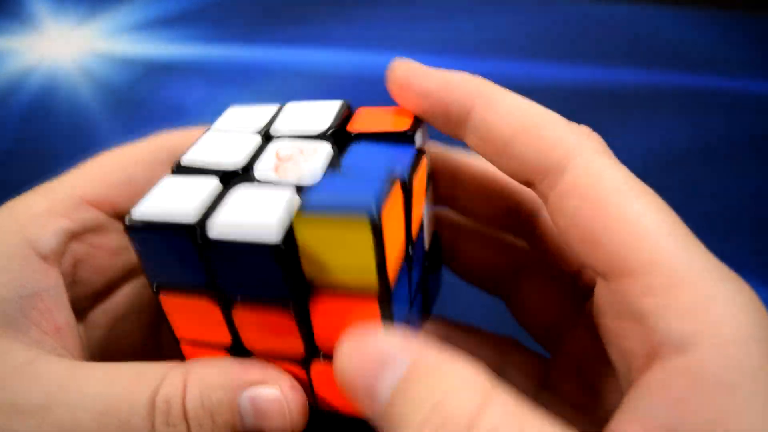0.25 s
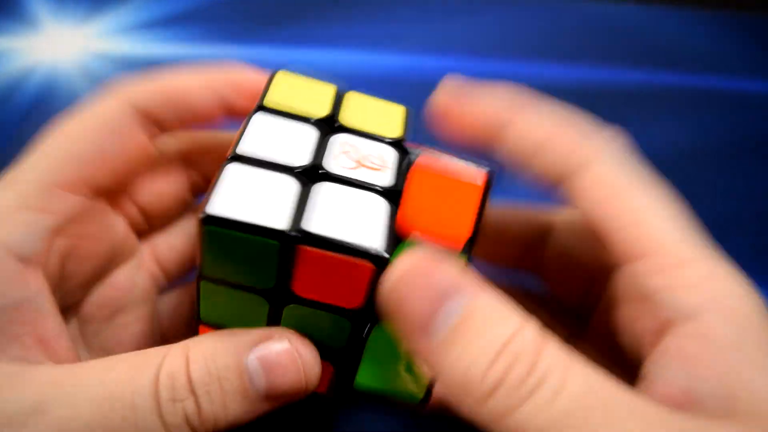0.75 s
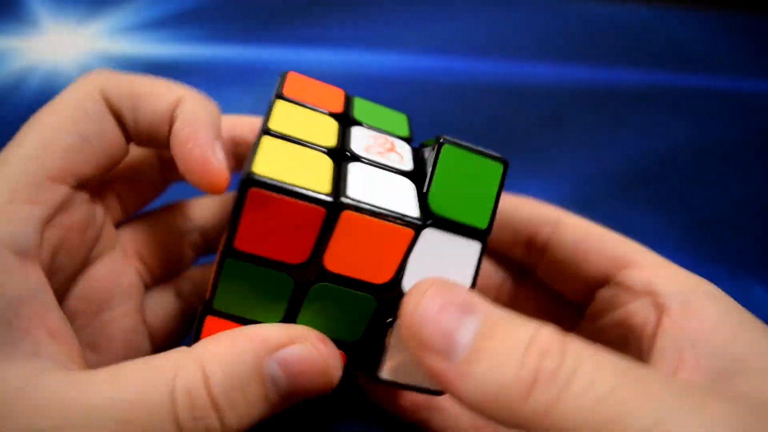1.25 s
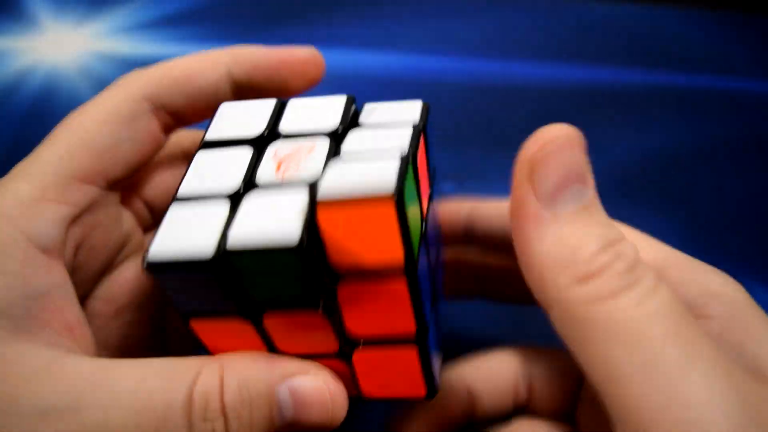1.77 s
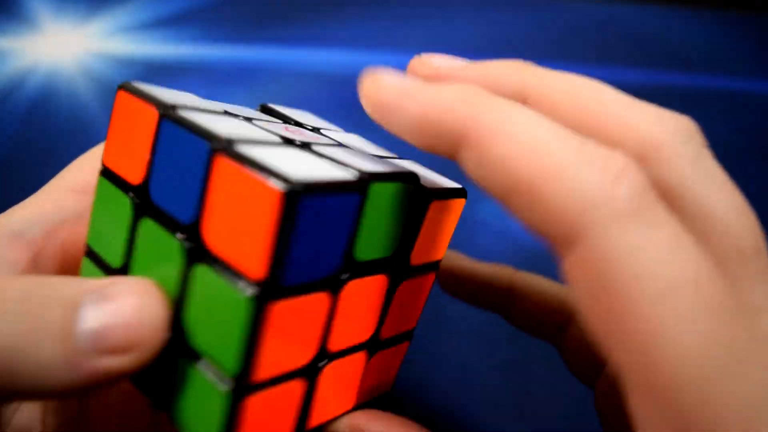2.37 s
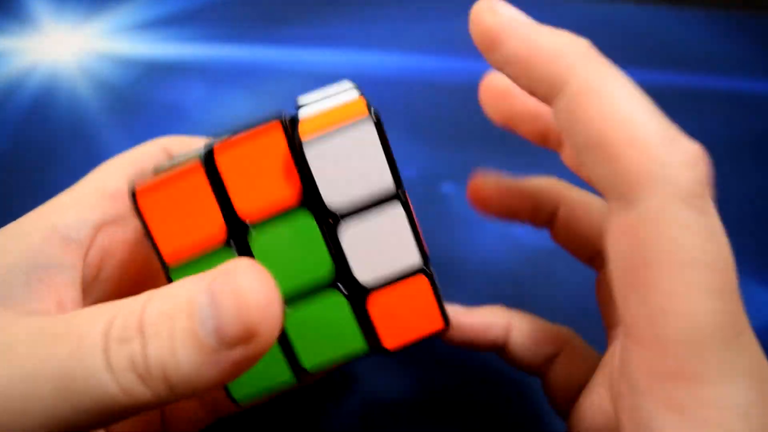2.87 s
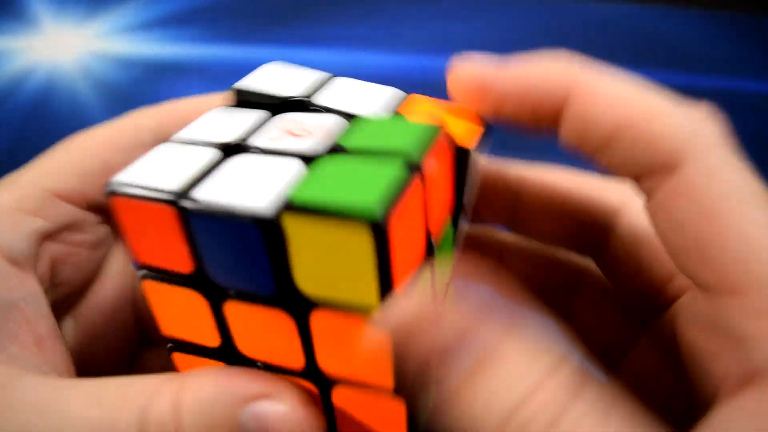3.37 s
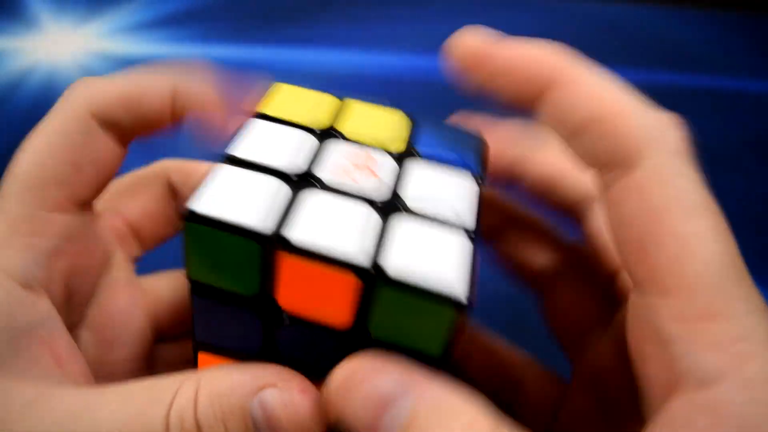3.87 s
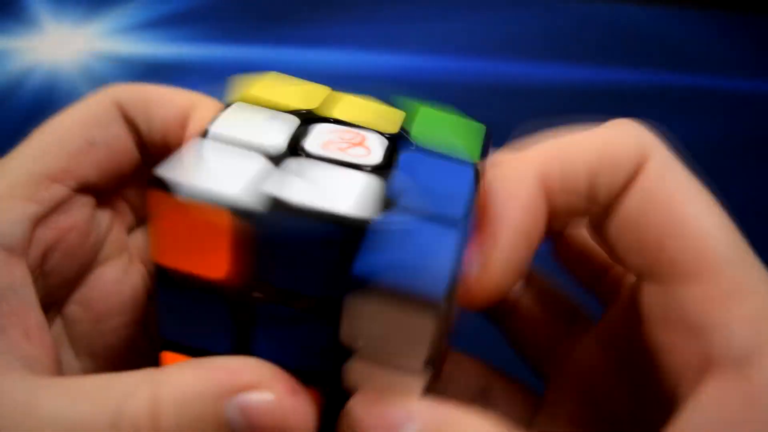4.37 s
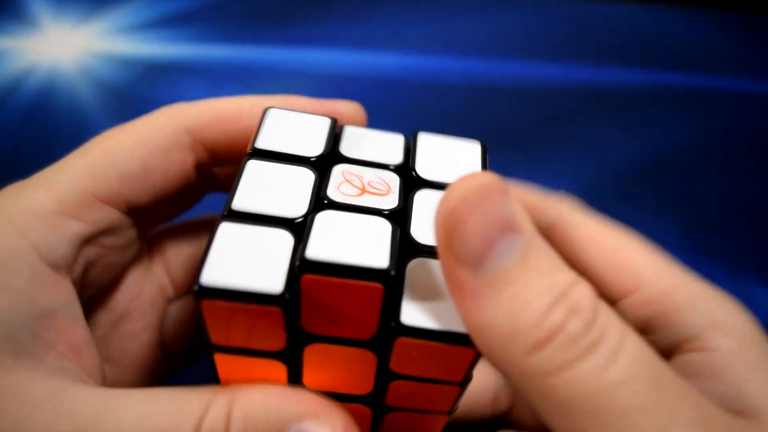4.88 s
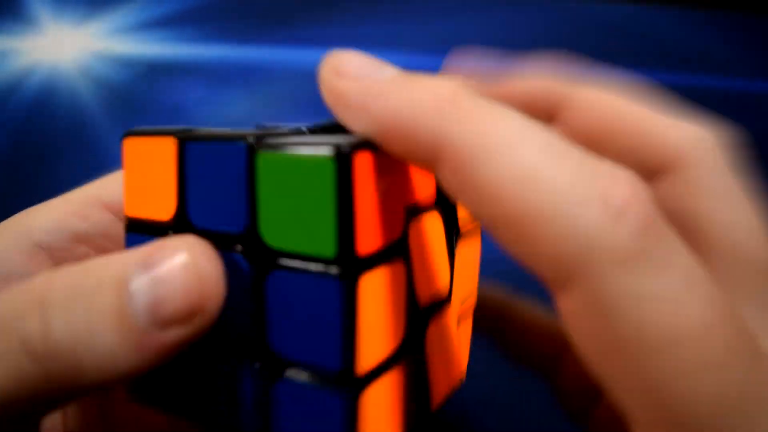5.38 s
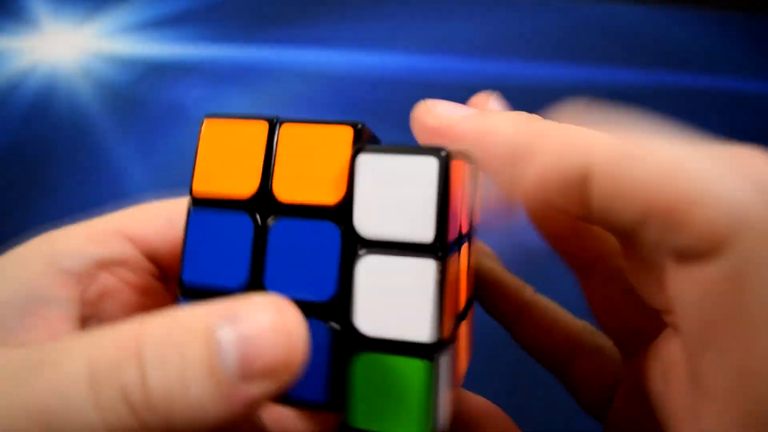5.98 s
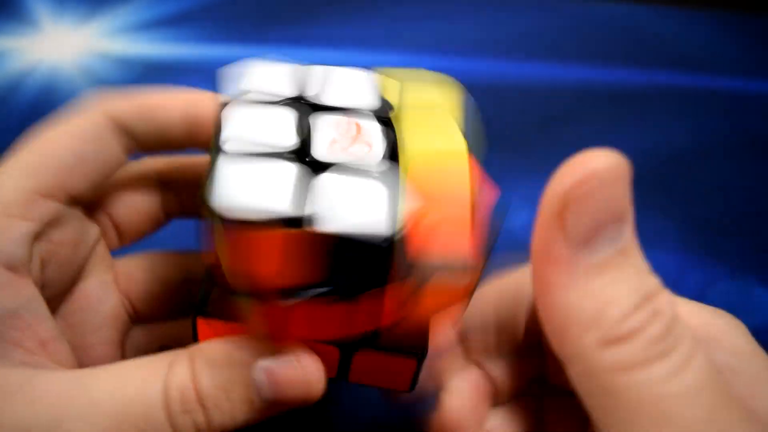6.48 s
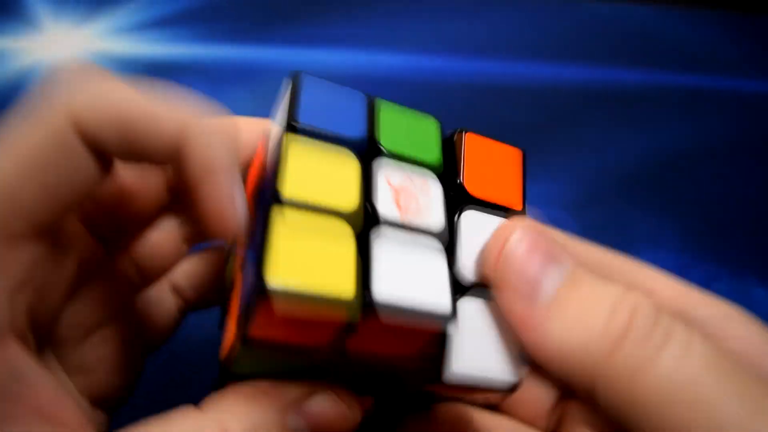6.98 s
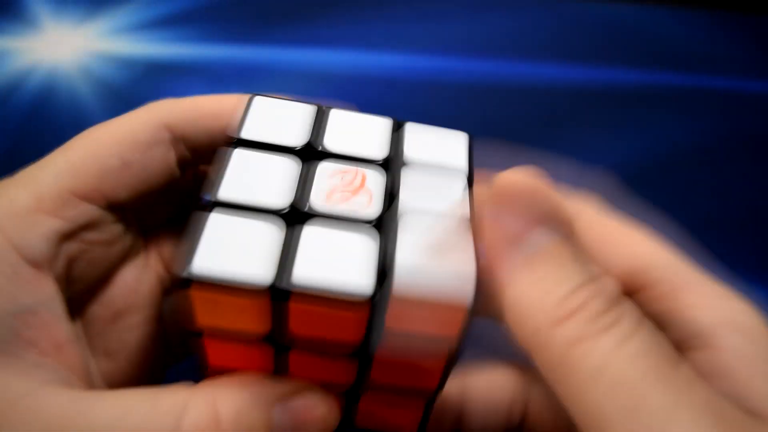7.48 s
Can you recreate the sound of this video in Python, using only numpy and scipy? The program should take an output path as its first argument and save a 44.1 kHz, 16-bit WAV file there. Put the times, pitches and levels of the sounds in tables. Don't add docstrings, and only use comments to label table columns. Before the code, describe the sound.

Very close, hands turn a hollow plastic puzzle cube in fast, uneven flurries. Light ridge ticks run into sharp snaps as layers lock, followed by tiny settling chatter and loose rattling. Two longer pauses leave only faint regripping ticks, then the turning returns, dense and loud towards the end. Small quiet room with short reflections, low appliance hum and camera hiss.

```python
import sys
import numpy as np
from scipy import signal
from scipy.fft import rfft, irfft, next_fast_len
from scipy.io import wavfile
from scipy.ndimage import uniform_filter1d

SR = 44100
rng = np.random.default_rng(int(sys.argv[2]) if len(sys.argv) > 2 else 0)


def boost(x):
    u = np.asarray(x, float) / 20
    return 10 ** u


def pcm_store(signal):
    levels = np.round(np.clip(np.atleast_2d(signal), -1, 1) * 32767)
    wavfile.write(sys.argv[1], SR, levels.astype(np.int16).T)


N = 341323

KNOCK_SAMPLES = 640
LEAD_S = 0.002
THUD_PER_HOLLOW = 0.27


def evened(x):
    return x / np.sqrt(np.mean(x ** 2) + 1e-20)


def read(points, hz):
    point_hz, value = np.transpose(points)
    return np.interp(np.log(hz + 1), np.log(point_hz + 1), value)


def add(mix, start_s, sound):
    part = mix[max(round(start_s * SR), 0):][:len(sound)]
    part += sound[:len(part)]


# frequency in Hz, density in dB per Hz.
AIR_SPECTRUM = [(20, -15.5), (48, -8.5), (85, -11.5), (150, -3), (290, -6.5), (460, -12), (1000, -16),
                (2050, -13), (2700, -25), (3700, -21), (5300, -20), (8000, -29.5), (12200, -34),
                (16000, -32)]
# time in seconds, level in dB.
WHINE_DRIFT = [(0, -77.5), (2.2, -80.5), (2.5, -77), (3.0, -80), (3.35, -76), (5.2, -76), (5.5, -81),
               (7.74, -81)]
# frequency in Hz, width in Hz, level in dB.
FAN_TONES = [(288.6, 23, -82), (531, 18, -86.5)]


def air():
    air_db, hiss_top_hz = -70, 12850
    whine_hz, whine_width_hz = 4370, 370
    hum_hz, hum_db, hum_waver_db, hum_waver_rad = 120, -75.5, 1.6, 1.0
    size = next_fast_len(N)
    hz = np.fft.rfftfreq(size, 1 / SR)
    t = np.arange(N) / SR

    def noise(gain):
        spectrum = rfft(rng.standard_normal(N), size)
        return evened(irfft(spectrum * gain)[:N])

    whine_db = np.interp(t, *np.transpose(WHINE_DRIFT))
    whine = boost(whine_db) * noise(1 / (1 + (2 * (hz - whine_hz) / whine_width_hz) ** 4))
    fan = np.zeros(N)
    for tone_hz, width_hz, db in FAN_TONES:
        fan += boost(db) * noise(1 / (1 + (2 * (hz - tone_hz) / width_hz) ** 2))
    hum_level = boost(hum_db + hum_waver_db * noise((hz > 4) & (hz < 14)))
    hum_phase = 2 * np.pi * hum_hz * t + hum_waver_rad * noise(hz < 5)
    hum = hum_level * evened(np.sin(hum_phase))
    hiss = boost(air_db) * noise(boost(read(AIR_SPECTRUM, hz)) * (hz < hiss_top_hz))
    return hiss + whine + hum + fan


def rings(modes, count, rise_s=0.00024, spread_s=0.00042, graze_db=3.5, detune=0.07):
    uneven_db = 3
    hz, db, t60_s = (np.tile(v, 3)[:, None] for v in np.transpose(np.float32(modes)))
    draws = np.float32(rng.standard_normal((count, 4, len(hz), 1)))
    tune, spot, late, sign = draws.transpose(1, 0, 2, 3)
    delay_s = np.clip(spread_s * late, -spread_s, 2 * LEAD_S)
    t = np.maximum(np.float32(np.arange(KNOCK_SAMPLES) / SR - LEAD_S) - delay_s, 0)
    waves = np.sin(2 * np.pi * hz * (1 + detune * tune) * t)
    waves = waves * (1 - np.exp(-t / rise_s)) * np.sign(sign)
    fade = np.exp(np.float32(-np.log(1000)) / t60_s * t)
    level = np.float32(boost(db + uneven_db * spot - graze_db * abs(late)))
    ring = (level * fade * waves).sum(1)
    return ring / abs(ring).max(1, keepdims=True)


def crack():
    hz, t60_s, db = 5100, 0.0011, -5.0
    t = np.maximum(np.arange(KNOCK_SAMPLES) / SR - LEAD_S - 0.0002, 0)
    return -boost(db - 60 * t / t60_s) * np.sin(2 * np.pi * hz * t) * (1 - np.exp(-t / 7e-5))


# frequency in Hz, level in dB, t60 in seconds.
HOLLOW_MODES = [(1340, -13, 0.0052), (1907, -2.5, 0.0074), (2045, 2, 0.0036), (2485, -0.5, 0.0054),
                (3064, 5.5, 0.0037)]
SHELL_MODES = [(3974, -2, 0.0088), (4810, 3, 0.0029), (5217, 3, 0.0083), (6060, -12, 0.029),
               (6580, 0.5, 0.008), (7740, -9, 0.01)]
EDGE_MODES = [(8400, -4, 0.0022), (9600, -6, 0.0014), (11000, -9, 0.0016), (12660, -12, 0.0016),
              (14870, -23, 0.0012)]
THUD_MODES = [(375, -17.5, 0.0022), (549, -11, 0.019), (1020, 5, 0.012)]


def knock(rows):
    start_s, shell_db, hollow_db, edge_db, thud_db = (v[:, None] for v in np.transpose(rows))
    count = len(start_s)
    sound = rings(SHELL_MODES, count)
    sound += boost(hollow_db - 0.5) * rings(HOLLOW_MODES, count, rise_s=0.00046)
    sound += boost(edge_db - 3.0) * rings(EDGE_MODES, count, detune=0.11, spread_s=0.0009)
    sound += crack()
    sound += boost(thud_db - 9.5) * rings(THUD_MODES, count, rise_s=0.002)
    out = np.zeros(N)
    for at_s, ring in zip(start_s[:, 0], boost(shell_db - 1.5) * sound):
        add(out, at_s + 0.0007 - LEAD_S, ring)
    return out


# start in seconds, shell peak in
# dB, hollow cavity in dB re shell.
CONTACTS = [(0.0006, -63, 0), (0.1823, -63, -1), (0.1867, -56, 3.0), (0.193, -59.5, 3.0),
            (0.202, -61, 6.0), (0.31, -40.5, 3.0), (0.3485, -57, -5), (0.3516, -55.5, 2),
            (0.364, -57, 9), (0.378, -44, -1), (0.3922, -37, -1), (0.4313, -26.5, 1.5),
            (0.519, -37, 4), (0.709, -61.0, 3), (0.739, -63, 17), (0.7494, -60.0, 6),
            (0.8052, -57, 4), (0.823, -54, 4), (0.849, -61, 4), (0.8765, -56, 6.0), (0.906, -44, 1),
            (0.9214, -64, 4), (0.9419, -56, 0), (0.9635, -56.0, -6), (0.986, -59, 8), (1.013, -66, 5),
            (1.067, -70, 7), (1.1287, -58, 13), (1.1506, -19, -18), (1.352, -42.5, 0),
            (1.3872, -22, 0), (1.4112, -18, -1), (1.419, -32.5, 7), (1.4253, -42, 6),
            (1.5053, -24, -12), (1.5322, -31, -10), (1.5587, -38.5, 0), (1.5653, -41, -3),
            (1.623, -51, -6), (1.6734, -39, -4), (1.7498, -30, -4), (1.7622, -44, 4.5),
            (1.852, -52.0, 4), (1.864, -56, -3), (1.9, -57, -1), (1.9448, -69, 8), (2.038, -52, -3),
            (2.0424, -64, 6), (2.2497, -59.5, 6),
            (2.3864, -66, 0), (2.637, -55, 6), (2.755, -39, -1), (2.7586, -35.0, -10),
                   (2.7644, -40, -12), (2.789, -43, 6.0), (2.8642, -52, 0), (2.8809, -57, 2),
                   (2.885, -61, 6), (3.096, -65, 10), (3.1192, -53, 6), (3.1333, -62, 8),
                   (3.2255, -60.5, 2), (3.246, -66, 12.0), (3.265, -63, -7.0), (3.4277, -56, 0),
                   (3.6413, -60, 13), (3.6652, -57, 10), (3.6986, -39, 5), (3.7189, -41.5, 6.5),
                   (3.7248, -51, 6), (3.8005, -37, -1), (3.815, -24.5, -8), (3.9514, -52, 3),
                   (4.1534, -40, 7.5), (4.1704, -23, -10), (4.175, -27, -5), (4.1963, -28.5, 6.5),
                   (4.213, -45, 7), (4.3142, -46.5, 6), (4.335, -35.5, 3), (4.34, -42, 0),
                   (4.347, -41, -4.5), (4.356, -41, -5), (4.388, -31.5, 0), (4.4113, -15, -4),
                   (4.4234, -29, -5), (4.427, -25.5, -8.5), (4.4378, -28.5, 1), (4.525, -21, -1.5),
                   (4.6264, -45, 5.5), (4.6496, -50, 4), (4.6562, -47, -2.0), (4.6637, -45, -6),
                   (4.667, -51, 0), (4.688, -44, -6), (4.7387, -56, 7.5), (4.7622, -41, 1.5),
                   (4.7979, -27.5, 4), (4.8674, -37, -2), (4.884, -27.5, -11), (4.9238, -44, 2.5),
            (5.463, -61.5, 8), (5.5285, -69, 10), (5.5907, -50, 5), (5.6931, -21.5, -2),
                 (5.776, -32, 3), (5.7985, -48, -7), (5.8617, -18, -0.5), (5.867, -30, 1), (5.9572, -41, 1),
                 (5.9665, -26.5, -1.5), (6.002, -40, -5), (6.1076, -59, 0.5), (6.3248, -51.5, -7.5),
                 (6.467, -31.5, -12), (6.497, -37, -8), (6.5643, -31, 1), (6.696, -47, 1), (6.717, -47, -1),
                 (6.7675, -38, -7), (6.814, -59, -3.0), (6.8603, -49, 5.0), (6.865, -52.0, 10),
                 (6.8917, -31, 3), (6.898, -36, 6), (6.9167, -28, -3), (6.934, -26, 1), (7.0604, -47, -4.0),
                 (7.0664, -45, 3.0), (7.1224, -46, -5), (7.133, -39, -1), (7.1447, -31, 2),
                 (7.173, -27, -15), (7.2105, -34, -14), (7.216, -35, -7), (7.2541, -26.5, -1),
                 (7.295, -32, 1), (7.3023, -34.5, 5.5), (7.313, -36, 1.0), (7.352, -44, 3.0),
                 (7.3562, -37, 2), (7.373, -39, -9.0), (7.378, -44, -7.0), (7.39, -42, -11),
                 (7.4102, -45, -10.0), (7.4646, -27.5, 4), (7.507, -30, -2), (7.5356, -36, 6),
                 (7.5505, -38, -6.0), (7.6505, -58.0, 0)]


def chatter(level_db=0):
    start_s, shell_db, hollow_db = np.transpose(CONTACTS)
    edge_db = -20 + 1.5 * np.maximum(shell_db + 24.5, 0)
    thud_db = -33.5 + THUD_PER_HOLLOW * hollow_db
    return knock(np.transpose([start_s, shell_db + level_db, hollow_db, edge_db, thud_db]))


# start in seconds, shell peak in dB, hollow
# cavity in dB re shell, # edge tick in dB re shell, thud in dB re shell.
HARD_KNOCKS = [(0.3963, -26, -3.5, -25, -9), (0.4343, -24.5, -1.5, -29, -10),
               (0.5338, -21.5, -6, -13, -11), (1.1222, -24.5, 2, -9, -21), (1.1372, -22, -6, -19, -20),
               (1.1442, -14.5, -6.5, -15.5, -16), (1.171, -28, -9, -19, -32),
               (1.1904, -32.5, -15, -23, -27), (1.2666, -29.5, -3, -28, -13.5),
               (1.2931, -28, -2, -18, -14), (1.3682, -18.5, -2.5, -23, -16),
               (1.3744, -16.5, -9.5, -14, -30), (1.3899, -20.5, -3.5, -5.5, -11),
               (1.4018, -17.5, -9, -12, -11), (1.4121, -17.5, -10.5, -7, -26),
               (1.4934, -15, -6.5, -8.5, -36), (1.5082, -21.5, -6, -2, -34),
               (1.6801, -33, -1, -17, -35.5), (1.6872, -20, 0, -20, -35), (1.6924, -10, -6.5, -17.5, -35),
               (1.7165, -28.5, 5, -23.5, -27.5), (1.7422, -28, -3.5, -20, -13),
               (2.6876, -24.5, -5, -20, -30), (2.6938, -21.5, -7, -12, -34),
               (2.7096, -19.5, -3, -22, -27), (2.745, -28.5, -4, -11, -21),
                      (2.7683, -35.5, 4.5, -24, -20), (3.5067, -25, -3, -18, -19), (3.804, -28.5, -7, -21, -32),
                      (3.8134, -21, -13.5, -17, -8.5), (4.1601, -26.5, 1, -12.5, -11),
                      (4.1685, -18.5, -5, -23, -34), (4.1953, -33, -0.5, 2, -5), (4.332, -27, -4.5, -19.5, -15),
                      (4.3888, -18, -5, -15, -25), (4.4059, -19, -8, -18, -33), (4.409, -15, -18, -14.5, -19.5),
                      (4.439, -24, -6, -5, -14), (4.5148, -25, -12, -2.5, -27), (4.5251, -22.5, -23, -15, -27),
                      (4.7802, -28.5, -3, -7, -12), (4.8006, -25.5, -7, -13, -11), (4.8285, -24, -4, -23, -16),
                      (4.876, -34, -4, -22, -6.5), (4.8809, -26, -5, -14, -14), (5.664, -10, -6.5, -3.5, -17),
                      (5.6673, -23, -23, -6, -17), (5.695, -36, -2, -13, -30), (5.8376, -16, -1.5, -3, -35),
                      (5.84, -10.5, -8.5, -3.5, -41),
               (5.8559, -8.5, -28, -11, -38), (5.8616, -24, 4.5, -11, -8), (5.9668, -30.5, -6, -21, -8),
                    (6.509, -27, 3, -15, -4), (6.5329, -18.5, -4.5, -18, -20), (6.552, -24.5, 0.5, -19, -13),
                    (6.5571, -15, -12, -11.5, -21), (6.8887, -25.5, -3.5, -24, -16), (6.9194, -30, 4, -20, -24),
                    (6.927, -19, -4.5, -12, -32), (6.9432, -20.5, -4, -23, -38),
                    (7.0476, -29.5, -4.5, -18, -11), (7.1426, -25, 1.5, -6, -12),
                    (7.153, -13.5, -8.5, -12, -22), (7.1626, -8.5, -15, -11, -22),
                    (7.1819, -10.5, -10, -8.5, -21), (7.2567, -25.5, 1.5, -8, -14),
                    (7.2621, -22.5, -4, -23, -32), (7.3567, -28, -7, -26, -31), (7.365, -32.5, -14, -7, -33),
                    (7.4365, -28, 2.5, -7, -23), (7.453, -25, -4, -15, -26), (7.468, -18, -2.5, -12, -37),
                    (7.4966, -25, -3, -20, -22)]
# start in seconds, shell peak in dB, hollow cavity in
# dB re # shell.
LIGHT_KNOCKS = [(0.0991, -49.5, 2), (0.145, -50, -12), (0.165, -47, -0.5), (0.245, -54.5, -18),
                (0.311, -42.5, 4), (0.357, -46, 3), (0.37, -40, 0), (0.3853, -40, -2), (0.458, -42, -1),
                (0.506, -34, -8), (0.5135, -32.5, 2), (0.5315, -24, -4.5), (0.6093, -47.5, 2),
                (0.642, -38.5, -8), (0.6634, -52, 2), (0.673, -50, -1), (0.7303, -48, -1),
                (0.7721, -38.5, -0.5), (0.791, -39.5, 0.5), (0.7988, -39, 1), (0.839, -46.5, 8),
                (0.895, -37, 1.5), (0.9445, -50.5, 4),
                (1.086, -41, -8), (1.0952, -38, 5.5), (1.347, -39.5, 0), (1.5652, -35, 2.5), (1.65, -38.5, -5),
                  (1.6655, -30, -5.5), (2.596, -48, -1), (2.611, -40.5, 2), (2.6268, -36.5, 4), (2.632, -38, 3),
                  (2.6471, -29, 0), (2.652, -31.5, -1), (2.679, -43, 3), (2.788, -43.5, 2), (2.8156, -38.5, 3),
                  (2.988, -58, 6), (3.03, -42, 0.5), (3.092, -49, 3.5), (3.1207, -62, 1), (3.1245, -53, -2),
                  (3.227, -57, 4), (3.2387, -43, 1),
                (3.411, -50.5, -0.5), (3.4308, -50, 1.5), (3.457, -51, 3), (3.471, -36.5, -2),
                  (3.489, -35.5, -2), (3.646, -44.5, 2.5), (3.657, -43, -1), (3.676, -50, 3), (3.687, -30, -1.5),
                  (3.7892, -35.5, 1.5), (3.836, -32, -5), (3.936, -49.5, 1), (3.943, -42, -0.5),
                  (4.0681, -43.5, -5), (4.081, -36, -5), (4.104, -43, 1), (4.1121, -35.5, 4), (4.139, -34, 3.5),
                  (4.1472, -30.5, 0.5), (4.2744, -32.5, -1), (4.326, -39, 2.5), (4.3644, -35, 1.5),
                  (4.374, -36.5, 0.5), (4.5081, -37, 2), (4.6004, -35.5, 3.5), (4.621, -35, -2),
                  (4.6355, -35.5, -4),
                (4.6848, -48, 1), (4.692, -46.5, 8.5), (4.749, -60, 8), (4.76, -39, 4.5), (4.774, -37, 5),
                  (4.849, -40, 4), (4.8653, -30, -5), (5.5708, -47, -2), (5.5904, -41, -1), (5.621, -38, 0.5),
                  (5.6426, -47, -2), (5.649, -37, -2), (5.656, -34.5, -1), (5.775, -38, -15),
                  (5.7914, -33.5, 0.5), (5.8228, -27.5, -4), (5.9428, -37.5, 5.5), (5.959, -38, 0),
                  (5.9893, -32.5, -1), (6.005, -35, -0.5), (6.107, -52.5, 7.5), (6.1551, -57, -14),
                  (6.243, -72, 12), (6.2594, -38, -3.5), (6.274, -40, -9.5), (6.345, -52.5, -20),
                (6.404, -55.0, -10), (6.4264, -38, 2.5), (6.456, -45, 4), (6.4667, -39.5, 4.5),
                  (6.481, -39, -2), (6.4852, -37, 4), (6.4913, -33.5, 4), (6.5131, -34.5, 0), (6.6519, -37, -5),
                  (6.708, -45.5, -6), (6.748, -47, -2), (6.7566, -37, -4.5), (6.7923, -40, -4.5),
                  (6.822, -49, -4), (6.8519, -33, 0.5), (6.8676, -47, 9), (6.8786, -37, -7), (6.911, -28.5, -12),
                  (7.091, -41, 4), (7.107, -39, 0), (7.1112, -37, -3), (7.136, -36, -4), (7.2879, -28, -2),
                  (7.3169, -31, 0), (7.425, -53, -3), (7.5004, -31.5, 9.5), (7.525, -23, -4),
                  (7.6618, -33.5, -2.5), (7.722, -61, 10)]
# start
# in seconds, shell peak in dB, hollow cavity in dB re shell.
FINGERS = [
    (1.944, -69, -1),
    (2.0308, -48.5, 0),
    (2.189, -53, -5),
    (2.229, -54.5, -19),
    (2.253, -64, 3),
    (2.3088, -56.5, 1),
    (2.3206, -63, -22),
    (2.3854, -72, -3),
    (2.411, -54.5, -9),
    (2.475, -68.5, 12),
           (5.185, -54.5, -3),
    (5.2, -58, 1),
    (5.2694, -62, 6),
    (5.294, -55.5, -3),
    (5.333, -56, -8),
    (5.3532, -53.5, -3),
    (5.38, -58.5, 6),
    (5.4354, -69, 0),
    (5.462, -75.5, 7),
    (5.528, -72.5, 16.5),
           (0.0034, -55, 0),
    (0.129, -63, -6),
    (0.2826, -70, 0),
    (0.925, -50, 0),
    (2.1144, -75, -7),
    (3.059, -56.5, -6.5),
    (3.2099, -72, 9),
    (3.2654, -72, -4),
    (3.3131, -69, -11),
    (6.1829, -62, -12),
]


def knocks(ticks_db=0):
    light = LIGHT_KNOCKS
    start_s, shell_db, hollow_db = np.transpose(light + FINGERS)
    edge_scatter, thud_scatter = rng.standard_normal((len(start_s), 2)).T
    edge_db = -22.5 - 0.08 * (shell_db + 40) + 2.5 * edge_scatter
    thud_db = -14 - 0.65 * (shell_db + 37.5) + THUD_PER_HOLLOW * hollow_db - 1 * thud_scatter
    ticks = np.transpose([start_s, shell_db + ticks_db, hollow_db, edge_db, thud_db])
    return knock(np.vstack([HARD_KNOCKS, ticks]))


def slide(knocked):
    per_s, uneven_db, t60_s, kinds = 500, 3.5, 0.074, 36
    grains = rings(SHELL_MODES, kinds)
    grains = grains + boost(2.5) * rings(HOLLOW_MODES, kinds)
    grains = grains + boost(0.5) * rings(EDGE_MODES, kinds, detune=0.092)
    strength = boost(uneven_db * np.minimum(rng.exponential(1, N), 4))
    strength = strength * (rng.random(N) < per_s / SR)
    piece = rng.integers(0, kinds, N)
    rattle = np.zeros(N)
    for at in np.flatnonzero(strength):
        add(rattle, at / SR, strength[at] * grains[piece[at]])
    keep = boost(-2 * 60 / (t60_s * SR))
    energy = uniform_filter1d(knocked ** 2, size=90).clip(0)
    shake = np.sqrt(signal.lfilter([1 - keep], [1, -keep], energy))
    return boost(-8.0) * shake * evened(rattle)


# delay in seconds, level in dB.
REFLECTIONS = [(.0035, -12.5), (.0078, -14), (0.012, -26), (0.018, -25)]


def echoes(x):
    out = np.zeros(N)
    for delay_s, db in REFLECTIONS:
        add(out, delay_s, boost(db) * x)
    return out


# frequency in Hz, t60 in seconds.
ROOM_DECAY = [(400, 0.42), (1300, 0.28), (3500, 0.26), (9000, 0.28), (15000, 0.28)]


def room(x):
    taps = np.zeros(SR // 2)
    at = np.arange(150, len(taps) - 12, 12)
    taps[at + rng.integers(0, 12, len(at))] = rng.choice([-1., 1.], len(at))
    hz, t, bands = signal.stft(taps, SR, nperseg=128)
    fade = boost(-60 * t / read(ROOM_DECAY, hz)[:, None])
    tail = signal.istft(bands * fade, SR, nperseg=128)[1]
    return signal.oaconvolve(x, tail / np.linalg.norm(tail))[:N]


def cavity(x):
    hz, width_hz, db = 1980, 700, -5.5
    return x + boost(db) * signal.lfilter(*signal.iirpeak(hz, hz / width_hz, SR), x)


# start in seconds, peak in dB.
PEELS = [
    (3.059, -57),
    (3.325, -65),
    (3.351, -71),
]


def skin():
    out = np.zeros(N)
    for (start_s, db), ring in zip(PEELS, rings(EDGE_MODES, len(PEELS))):
        add(out, start_s - LEAD_S, boost(db) * ring)
    return out


def palm():
    start_s, hz, t60_s, peak_db = 5.567, 260, 0.04, -50
    t = np.arange(2000) / SR
    out = np.zeros(N)
    bump = boost(peak_db - 60 * t / t60_s) * np.sin(2 * np.pi * hz * t) * np.minimum(t * hz, 1)
    add(out, start_s, bump)
    return out


def scene():
    near = knocks()
    sides = [knocks(ticks_db=-1.0) for _ in range(3)]
    rattle = slide(near)
    contacts = chatter()
    reverb = sum(room(side + rattle + chatter(level_db=-3.0)) for side in sides)
    far = cavity(echoes(near + rattle) + boost(-8.5) * reverb)
    no_bass = signal.butter(2, 260, "high", fs=SR, output="sos")
    cube = signal.sosfilt(no_bass, near + contacts + rattle + far)
    return (cube + palm() + air() + skin())[None]


def roll_off(x):
    return signal.sosfilt(signal.butter(12, 16510, fs=SR, output="sos"), x)


def record(dry):
    edge = signal.firwin(767, 15900, window=("kaiser", 8), fs=SR)
    mix = boost(-34) * dry + signal.oaconvolve(dry, edge[None], "same")
    return roll_off(mix)


dry = scene()
out = record(dry)
pcm_store(out)
```